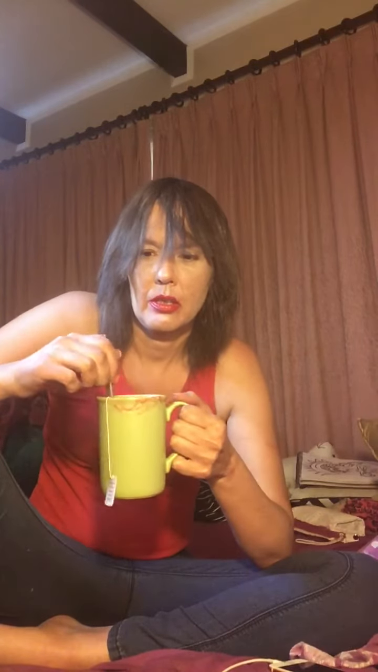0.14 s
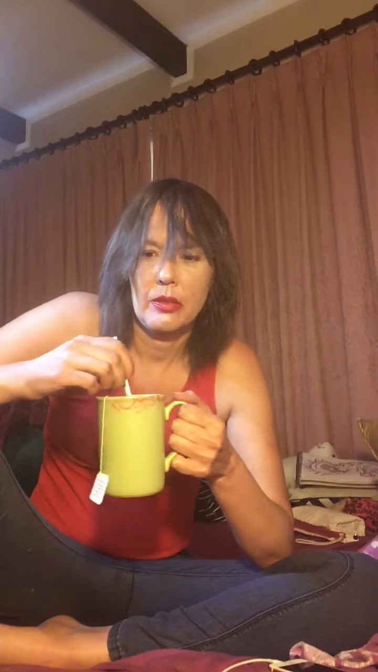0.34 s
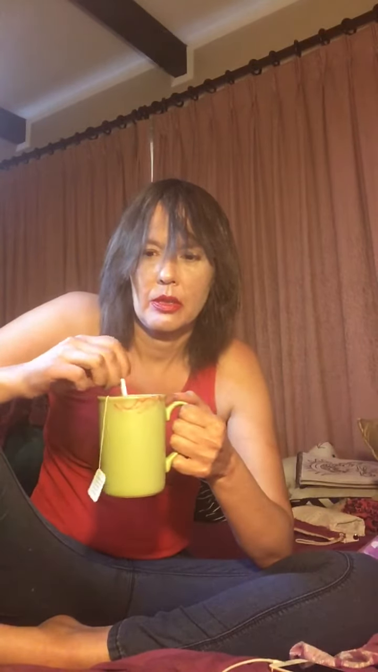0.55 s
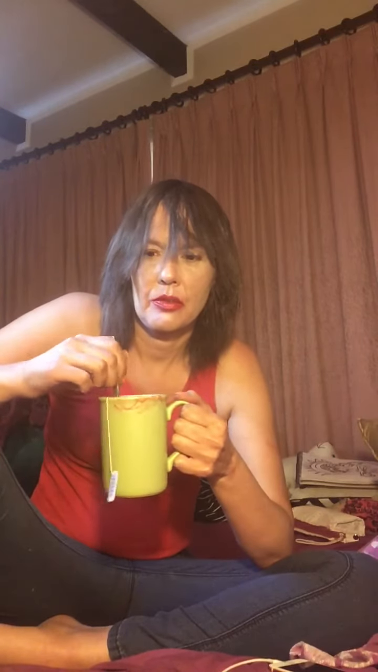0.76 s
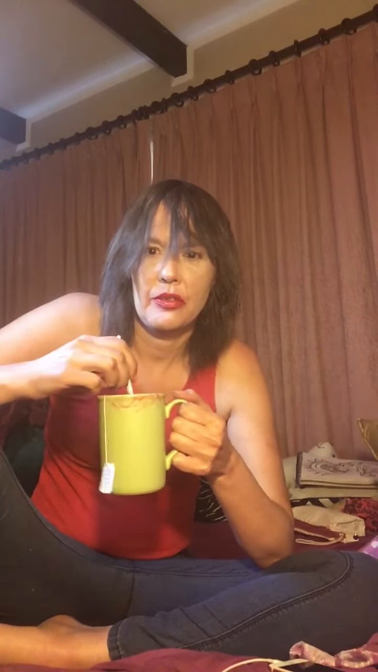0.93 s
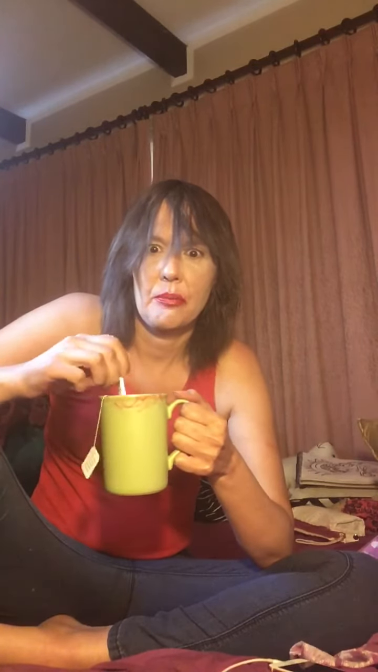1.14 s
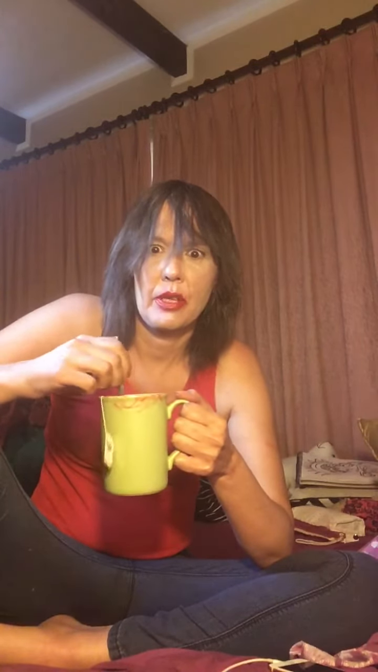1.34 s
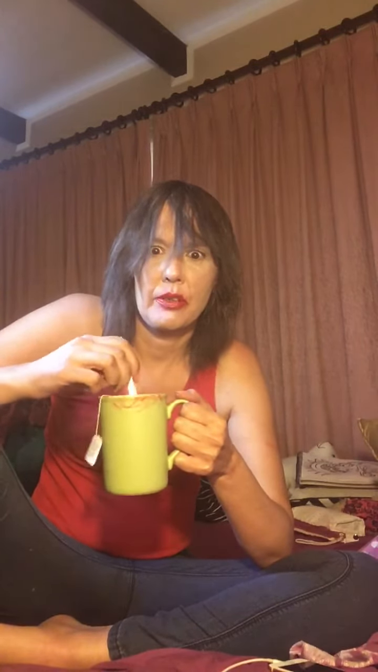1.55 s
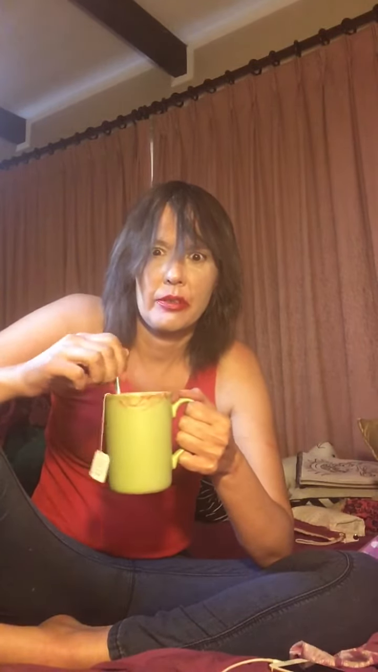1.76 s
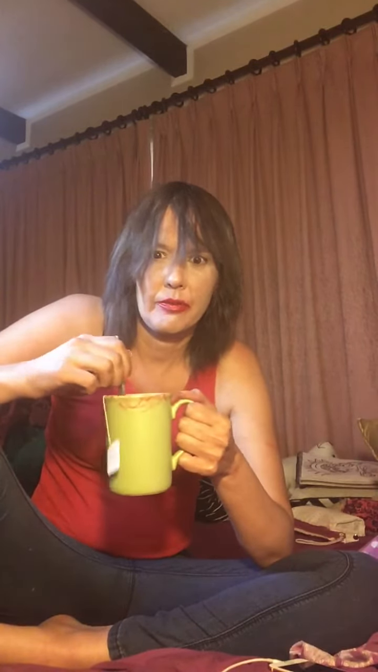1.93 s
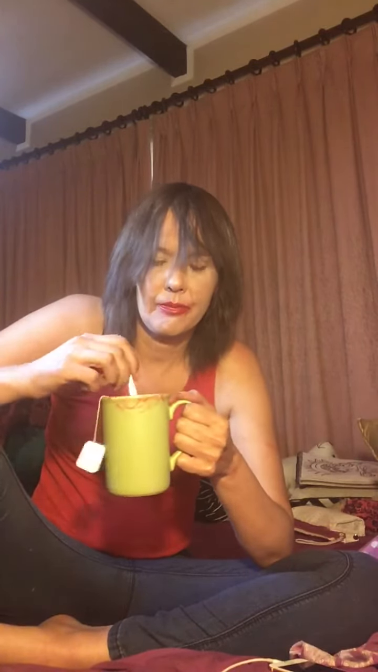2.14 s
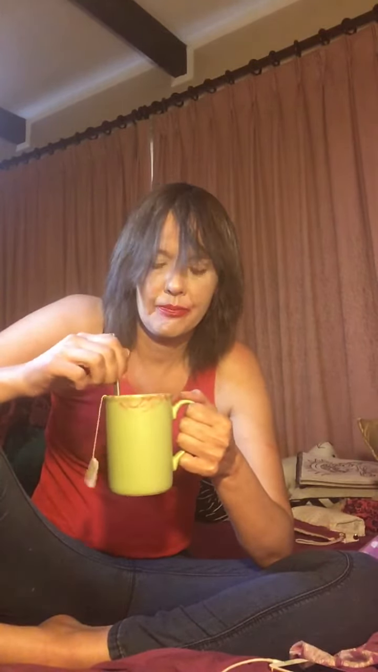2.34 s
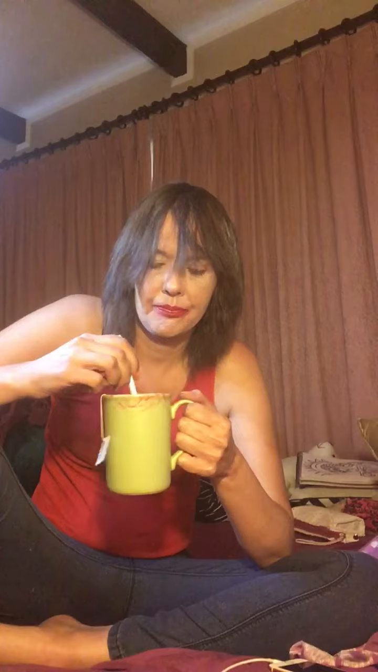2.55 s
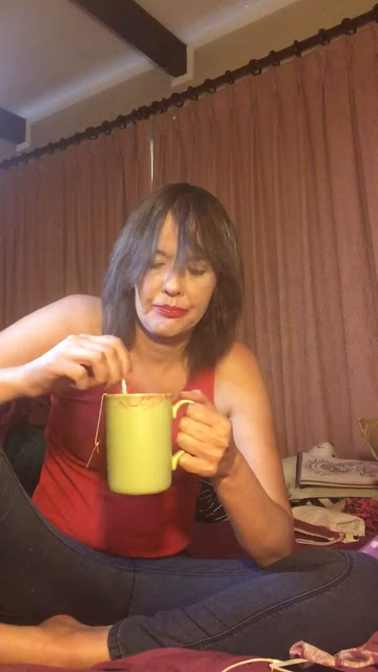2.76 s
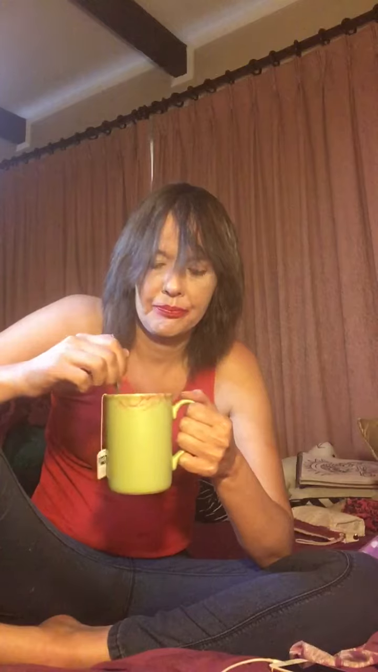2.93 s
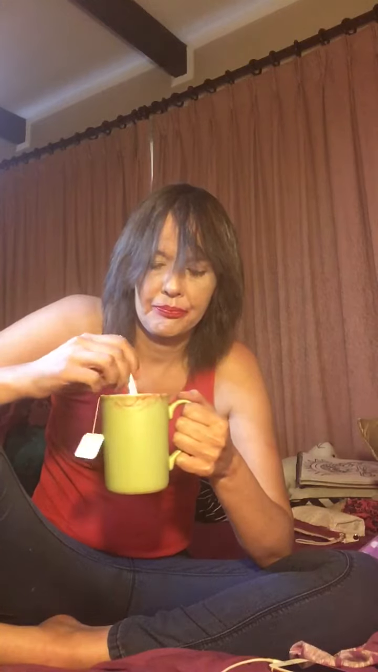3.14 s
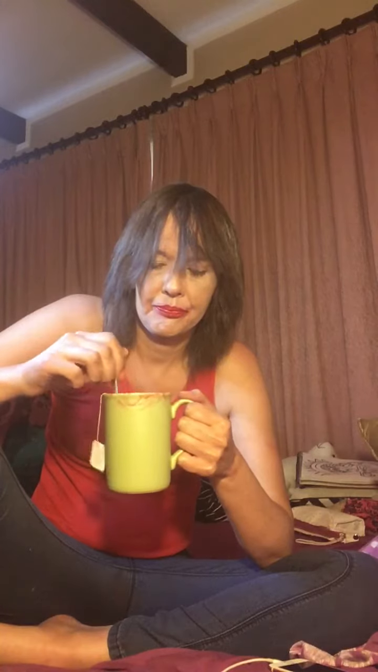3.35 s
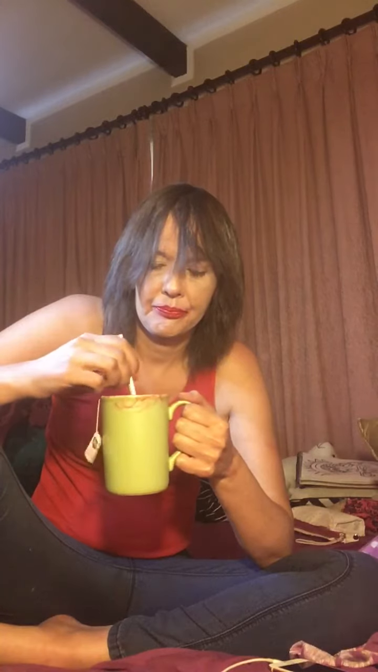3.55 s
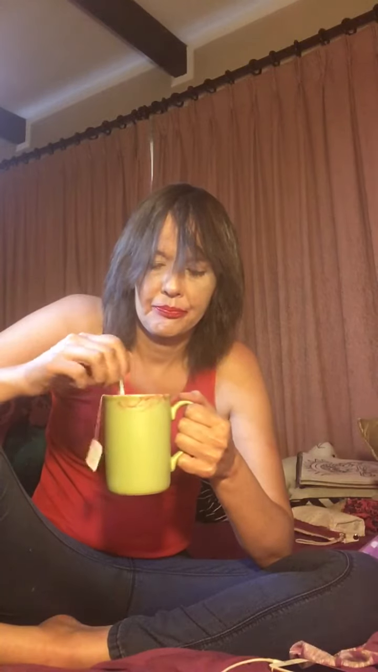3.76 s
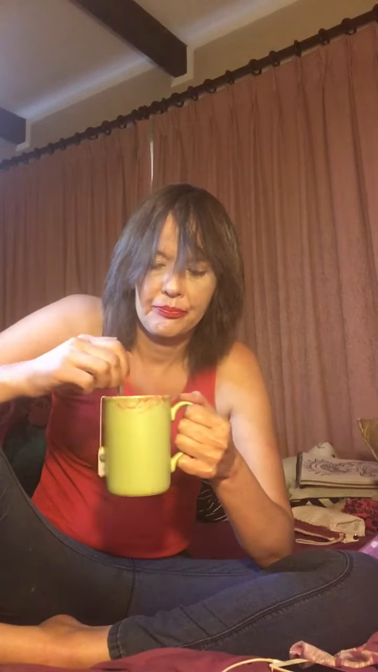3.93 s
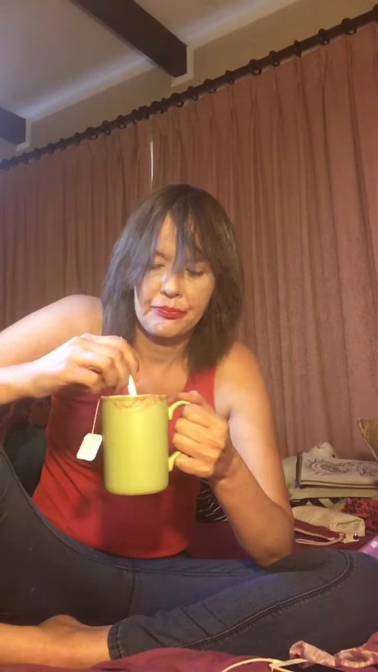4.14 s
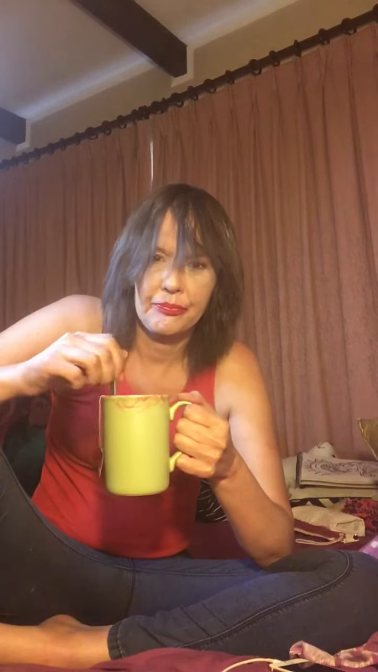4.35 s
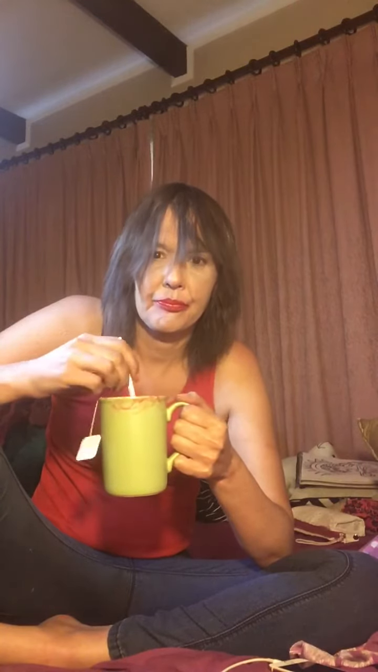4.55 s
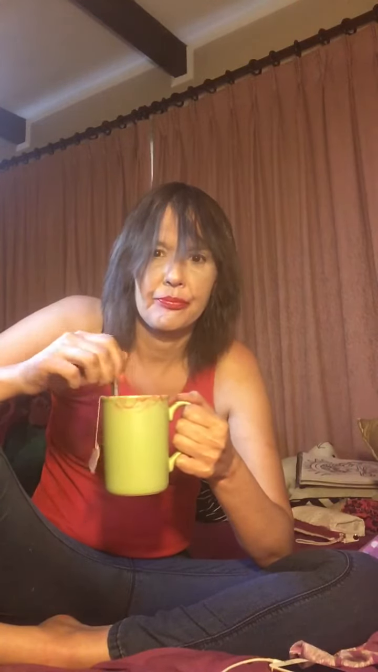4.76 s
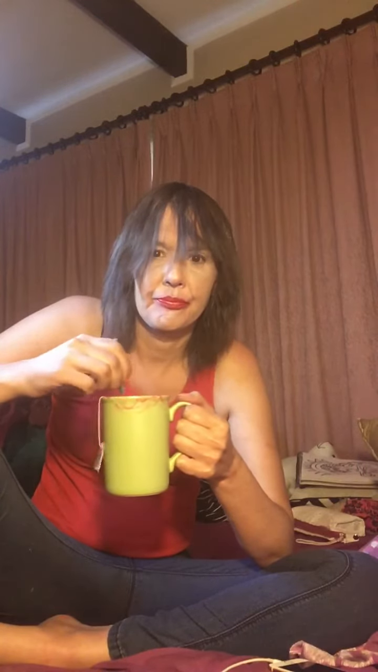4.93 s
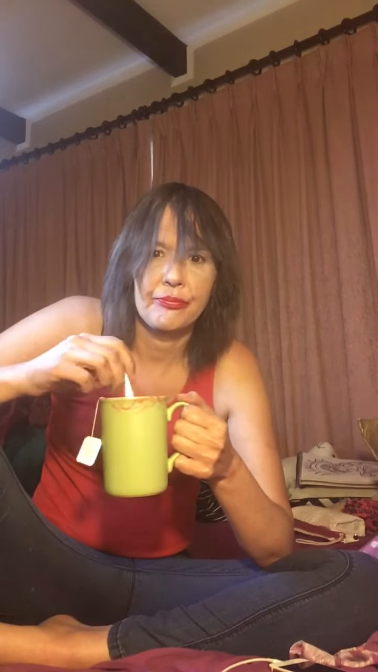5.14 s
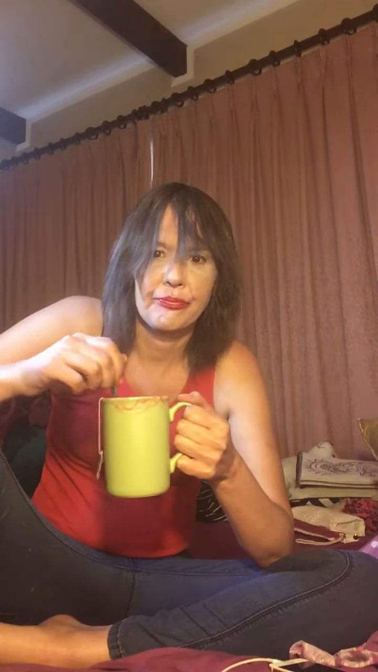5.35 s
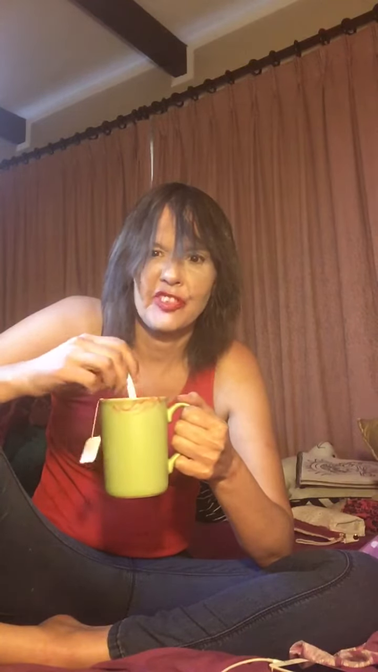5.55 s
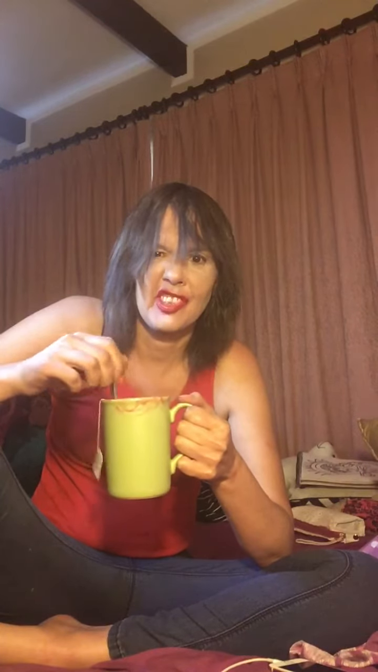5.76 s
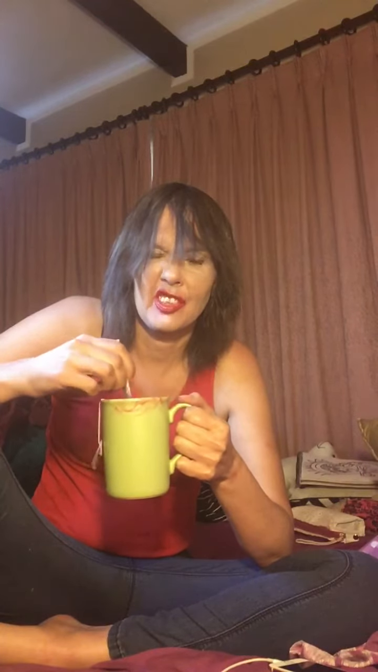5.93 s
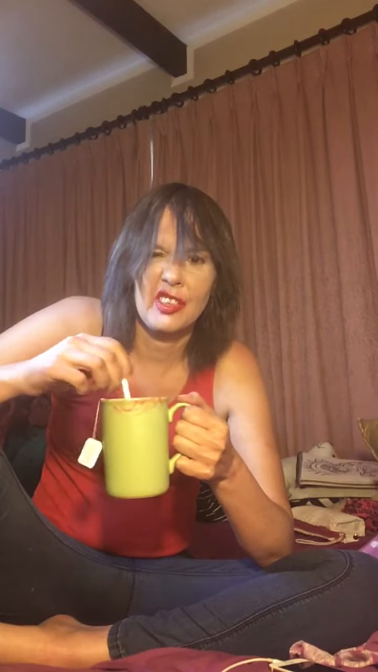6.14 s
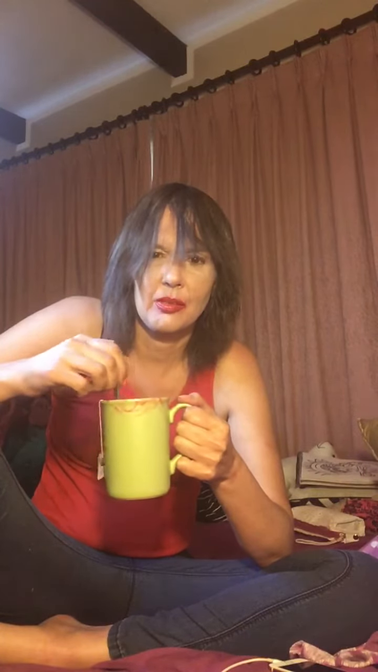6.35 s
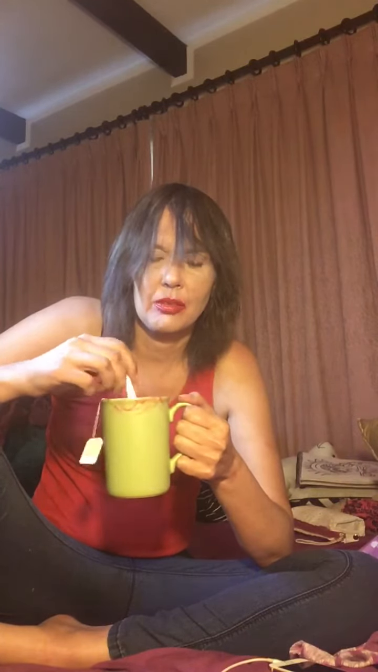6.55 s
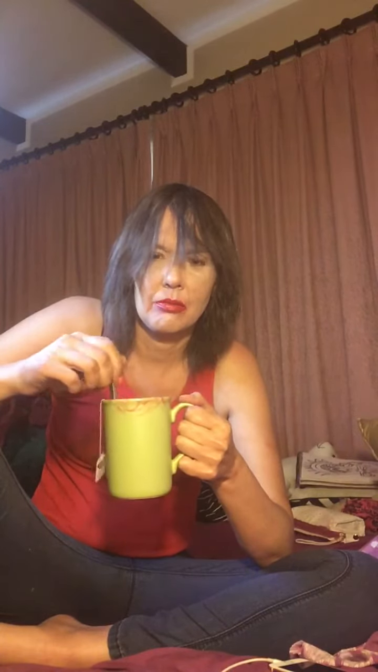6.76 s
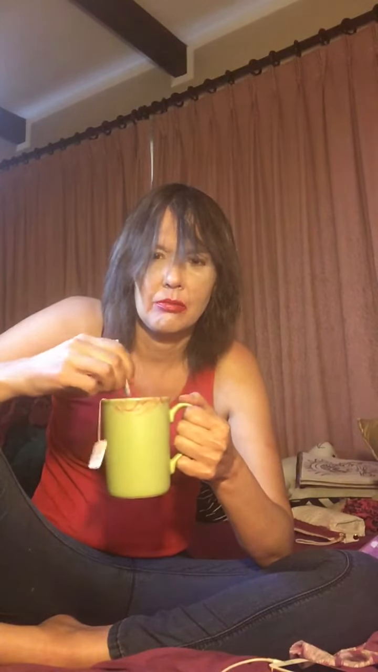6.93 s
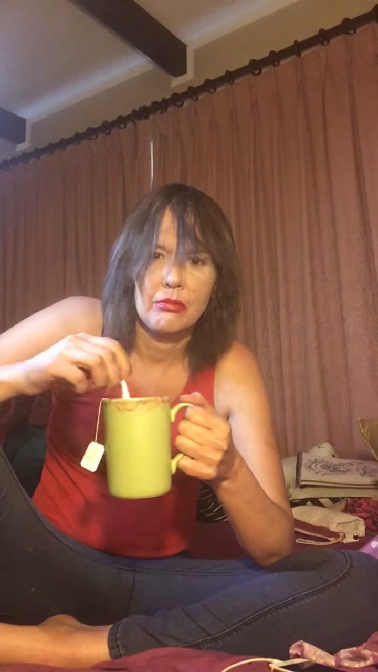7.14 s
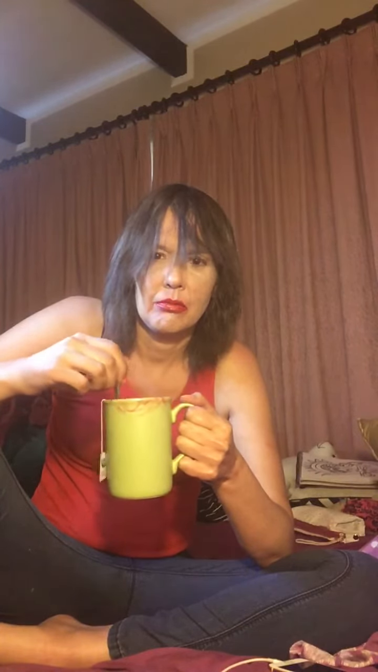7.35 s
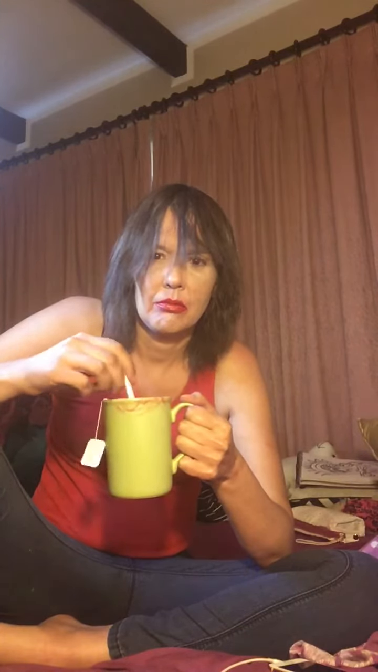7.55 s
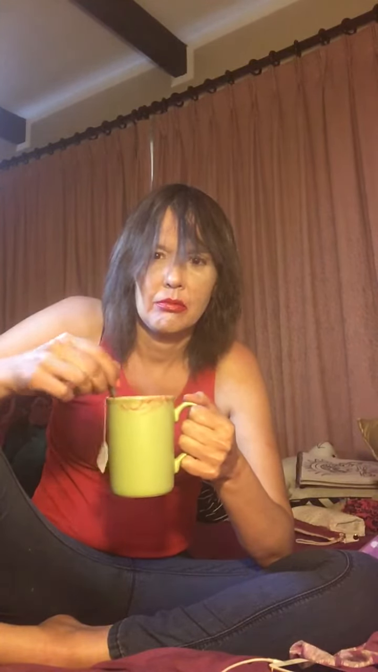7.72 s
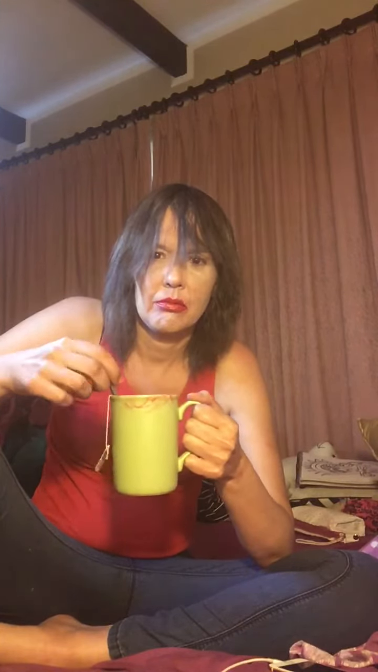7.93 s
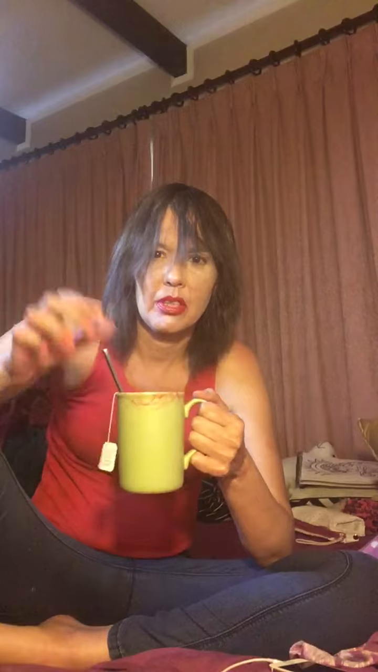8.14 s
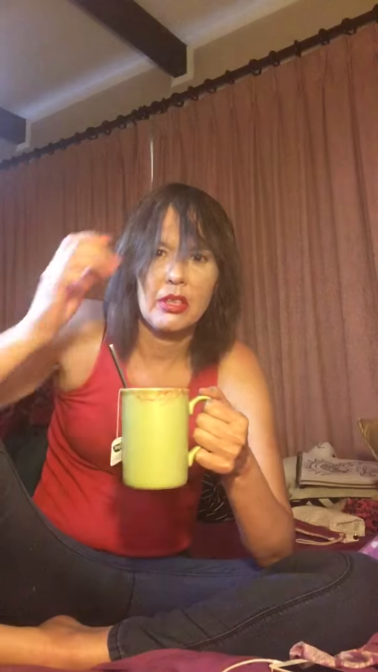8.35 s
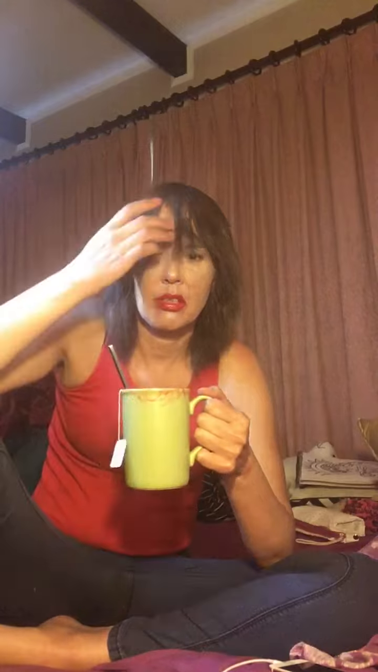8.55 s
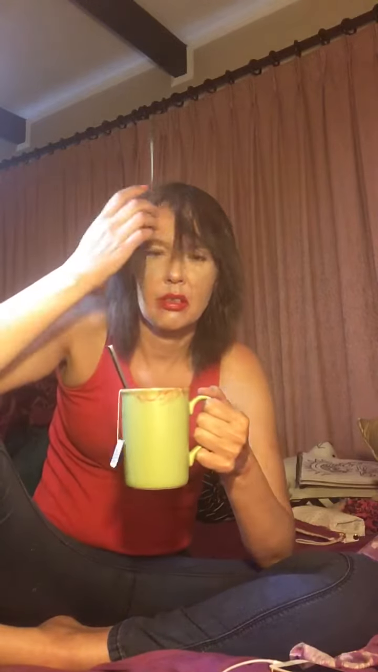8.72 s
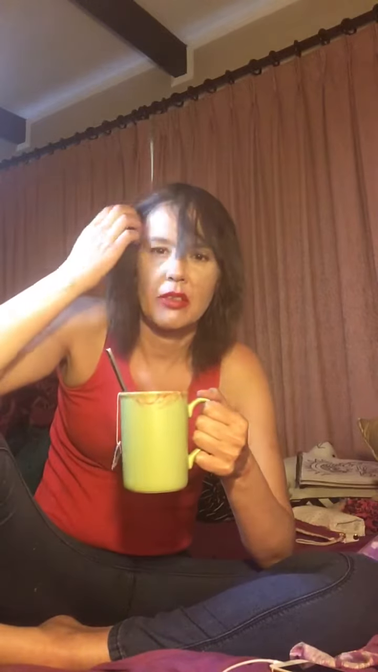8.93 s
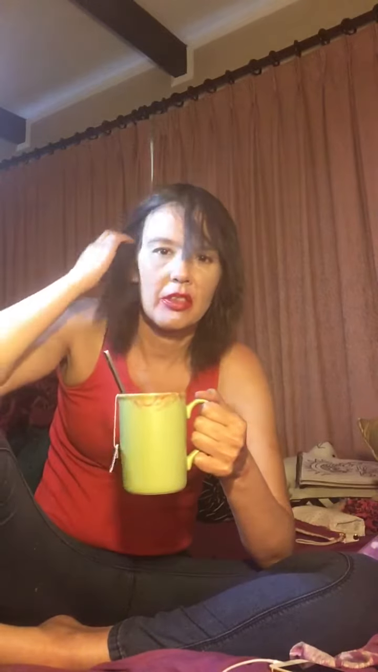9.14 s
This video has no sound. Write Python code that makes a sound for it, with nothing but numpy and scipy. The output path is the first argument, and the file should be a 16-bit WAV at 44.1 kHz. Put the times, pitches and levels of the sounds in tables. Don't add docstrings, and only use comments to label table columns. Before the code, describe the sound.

Bright spoon clinks and gritty scrapes circle inside a tea-filled ceramic mug for about eight seconds, ending abruptly in soft room hush.

```python
import sys
import numpy as np
from scipy import signal
from scipy.fft import rfft, irfft, next_fast_len
from scipy.io import wavfile
from scipy.ndimage import map_coordinates

SR = 44100
rng = np.random.default_rng(int(sys.argv[2]) if len(sys.argv) > 2 else 0)


def generate_wav(signal):
    frames = np.transpose(np.atleast_2d(signal))
    scaled = np.clip(frames, -1, 1) * 32767
    pcm = np.round(scaled).astype(np.int16)
    wavfile.write(sys.argv[1], SR, pcm)


def invert_db(x):
    u = np.asarray(x, float) / 20
    return 10 ** u


N = 409688

# frequency in Hz, density in dB per Hz.
RUMBLE = [(15, -39), (25, 7), (37, -10.5), (97, 1), (129, -7), (236, -9), (303, -16), (430, -20.5),
          (500, -28), (650, -38), (1100, -120)]
THUMP = [(40, -18), (70, 6), (110, 2), (160, -6), (230, 7.5), (300, -8), (500, -60.5)]
HISS = [(300, 3.5), (450, -6.5), (650, -3.5), (900, -5.5), (2600, -7), (6000, -12), (12000, -16),
        (14500, -18), (15900, -21)]
HOUSE_DB, HISS_DB = -66, -70
# centre in seconds, rise in dB, length in seconds.
SWELLS = [(0.47, 7, 0.12), (0.687, 13.5, 0.04), (1.3, 5, 0.11), (1.645, 4, .06), (2.063, 8.5, .13),
          (3.69, 6.5, 0.055), (4.5, 6, 0.029), (5.3, 2.5, 0.069), (6.24, 4.5, .12), (6.953, 11, 0.078),
          (7.957, 5, 0.12), (8.785, 4.5, 0.058), (9.106, -0.5, 0.053), (9.29, -0.5, 0.038)]
# centre in seconds, level in dB, centre in Hz, length in seconds.
RUSTLES = [
    (8.248, -66.5, 820, 0.02),
    (9.19, -74, 3800, 0.015),
    (9.235, -64, 820, 0.023),
    (9.23, -66.5, 2900, 0.012),
]
# frequency in Hz, T60 in seconds.
ROOM = [(500, 0.36), (2000, 0.21), (6000, 0.25), (14000, 0.21)]

# frequency in Hz, width in Hz, level in dB.
TEA = [(693, 116, -8), (1049, 35, -3.5), (1149, 20, -4.5), (1318, 91, 12.5), (1585, 86, -10)]
WALL = [(2040, 150, -43), (1949, 40, -2.5), (1987, 22, -7.5), (2022, 59, -0.5), (2044, 42, -9),
        (2055, 13, -4.5), (2164, 112, -5)]
RIM = [(2514, 30, -9.5), (2762, 155, 5.5), (2923, 88, 1), (3120, 270, -12), (3626, 34, -10),
       (4025, 86, -2.5), (4565, 90, 1.5)]
SPOON = [(5330, 185, 4), (5700, 56, -9), (5650, 10.7, -10.5), (5940, 86, 5.5), (5830, 133, 10),
         (6297, 77, 14), (6620, 9.4, -4), (6210, 36, -15)]
SHIMMER = [(7420, 160, -9), (7390, 62, -17.5), (9050, 1000, -5), (8164, 100, -2.5), (8990, 115, 0.5),
           (10520, 91, -3), (12400, 220, -43), (12900, 500, -22), (11700, 990, -16), (12250, 72, -3),
           (13840, 200, -12.5)]
FAMILIES = TEA, WALL, RIM, SPOON, SHIMMER

# top speed in seconds, mug in dB, spoon in dB, tea in dB, run-up in seconds.
NEAR = [(0.005, -50, -53.5, -86, 0.073), (0.09, -63.5, -65, -83, 0.058), (0.55, -57, -57, -92, .12),
        (0.91, -58.5, -63, -94, 0.069), (1.15, -54, -54.5, -78, 0.14), (1.68, -54, -57.5, -74, 0.12),
        (2.2, -55.5, -58, -67, 0.15), (2.46, -63, -68, -68, 0.081), (2.76, -53, -51.5, -75, 0.16),
        (3.28, -56, -53.5, -72, 0.16), (3.75, -53.5, -51.5, -94, 0.09), (4.27, -51.5, -52, -69, 0.12),
        (4.76, -52, -50.5, -94, 0.11), (5.24, -53.5, -52, -67, .15), (5.71, -53, -55.5, -80, 0.15),
        (6.2, -59, -59.5, -72, 0.23), (6.71, -54.5, -55.5, -83, 0.17), (7.18, -59, -56.5, -73, 0.12),
        (7.63, -59, -59.5, -67.5, 0.17), (0.35, -73, -79, -80, 0.09), (1.4, -67, -71.5, -68.5, 0.17),
        (0.2, -62, -71, -60, 0.029), (1.27, -88, -91, -71.5, 0.21)]
FAR = [(1.96, -53.5, -65.5, -79, 0.088), (3.03, -53, -62.5, -68, 0.2), (3.53, -47.5, -58, -66, 0.12),
       (4.02, -52, -62, -66.5, 0.17), (4.49, -51, -58.5, -69, 0.13), (4.99, -52.5, -63.5, -67, 0.13),
       (5.45, -51.5, -62.5, -66.5, 0.093), (5.92, -53.5, -65.5, -61, 0.11), (6.11, -71, -87, -75, .06),
       (6.5, -63, -81, -61.5, 0.068), (6.94, -58, -67, -67.5, 0.17), (7.42, -54, -66, -72, 0.15),
       (0.83, -71, -82, -63, 0.11), (6.33, -60, -67.5, -64.5, 0.02), (7.06, -61, -74, -66.5, 0.046),
       (4.62, -55, -73, -87, 0.08)]
RUN_UP_DB, RUN_OUT_S, RUN_OUT_DB, STOP_POWER = -14, 0.075, -11.5, 2.4
EDGE_DB, FAR_EDGE_DB = -6.5, -3.5
BRISK_DB, SHIMMER_GROWTH = -54, 0.6
# frequency in Hz, density in dB per Hz.
SCRAPE = [(300, -51), (700, -11.5), (2500, 6), (5000, -1), (8000, 0.5), (14000, -16.5), (16000, -33)]
SCRAPE_DB = -7.5

# start in seconds, mug in dB, spoon in dB, rim over wall in dB, shimmer over spoon in dB.
CLINKS = [(0.271, -29.5, -30, 1, 1.5), (0.4288, -44, -20, -3, -4.5), (0.8757, -27.5, -19, -9, -2.5),
          (1.8218, -43.5, -37, 5.5, -4), (2.4257, -33, -30, 0.3, 0.5), (2.8931, -48, -41.5, 10.5, -4),
          (3.3884, -37.5, -44, -1, 1), (4.3887, -36, -33.5, 1, 4.5), (6.3957, -33.5, -31, 0.5, -1.5),
          (7.8247, -35, -25, 5, 1), (7.9362, -35, -23, 4, -7.5)]
# first flight in seconds, loss per rebound in dB.
HOPS = [(.0243, 8.5), (0.026, 10), (.02, 29.5), (0.009, 5.5), (0.012, 14), (.0095, 5), (0.015, 18),
        (.02, 29), (0.03, 4), (0.0054, 21), (0.014, 1)]
FLIGHT_RATIO, REBOUNDS, CLINK_TEA_DB = 0.72, 4, -16.5
# start in seconds, mug in dB, spoon in dB, tea in dB.
KNOCKS = [(1.034, -51.5, -46, -71), (1.5391, -53, -50.5, -52), (1.6093, -42, -35, -62),
          (1.8088, -42.5, -41.5, -46), (2.0973, -45, -38, -52), (2.5943, -48, -42, -53),
          (3.204, -43.5, -39.5, -51.5), (3.5506, -43, -44.5, -59), (3.6298, -44, -43, -50.5),
          (3.8559, -38.5, -41.5, -44.5), (3.9034, -41.5, -39.5, -53), (4.1183, -42, -40, -40.5),
          (4.557, -38.5, -39.5, -40), (4.7918, -54, -40.5, -56), (4.931, -43, -44.5, -56.5),
          (5.0798, -43, -51, -44.5), (5.2969, -42.5, -41, -44), (5.5378, -42.5, -44, -45.5),
          (5.7181, -43, -35.5, -73), (5.89, -39, -32.5, -45), (6.0474, -44, -42, -48),
          (6.2601, -40.5, -38.5, -45.5), (6.7286, -42, -34.5, -55), (6.8781, -48, -50, -51),
          (7.2588, -38.5, -35.5, -47.5), (7.3495, -61, -64, -62), (7.5436, -47, -48, -57),
          (7.721, -46.5, -41, -45.5)]
# start in seconds, mug in dB, spoon in dB.
TAPS = [(0.9794, -67, -54), (1.6864, -59, -63), (1.72, -50, -38.5), (1.9414, -59, -57), (2.1849, -50, -59),
        (2.8094, -59, -58), (3.0274, -42.5, -48), (3.1252, -48, -46), (3.1736, -47.5, -43),
        (3.696, -40.5, -48), (4.1764, -45.5, -49), (4.5047, -47, -54), (4.5116, -44, -40),
        (5.0193, -62, -47), (5.3704, -49, -54), (5.779, -49, -61), (6.097, -52, -57), (6.9346, -44, -52),
        (7.0954, -46, -53), (7.6091, -56, -46)]
TAP_TEA_DB, RIM_DB, SHIMMER_DB, SPOT_DB = -16, 0.5, -1.5, 3.5
# start in seconds, level in dB.
TICKS = [
    (2.402, -56),
    (5.6321, -46.5),
    (7.374, -58),
    (8.1794, -59),
    (8.7154, -59),
]
SKID_S, SKID_DB, LEAD_S, LEAD_DB = 0.0026, -2.5, 0.0081, -24.5
SOFT_DB, SOFT_SKID = -37, 1.28
# frequency in Hz, density in dB per Hz.
CRACK = [(700, -39.5), (1300, -4), (3000, -1.5), (7500, 5), (10000, -14.5), (15000, -13)]
CRACK_DB, CRACK_S = -5, 0.0028
BELL_HZ, BELL_WIDTH_HZ, BELL_DB = 2078, 12, -7.5

LOW_HZ, TOP_HZ = 38, 15900


def unit(x):
    return x / np.sqrt(np.mean(x ** 2) + 1e-20)


def along(points, at_hz):
    hz, value = np.transpose(points)
    return np.interp(np.log(at_hz + 1), np.log(hz + 1), value)


def wobble(rate_hz):
    at = np.arange(0, N + 32, 32)
    knots = rng.standard_normal(int(N * rate_hz / SR) + 4)
    return np.interp(np.arange(N), at, map_coordinates(knots, [at * rate_hz / SR]))


def filtered(x, response):
    size = next_fast_len(len(x) + 8192)
    return irfft(rfft(x, size) * response(np.fft.rfftfreq(size, 1 / SR)), size)[:len(x)]


def coloured(spectrum):
    return unit(filtered(rng.standard_normal(N), lambda f: invert_db(along(spectrum, f))))


def background():
    t = np.arange(N) / SR
    house_db = HOUSE_DB + sum(db * np.exp(-0.5 * ((t - s) / length_s) ** 2) for s, db, length_s in SWELLS)
    rumble = invert_db(house_db + 1.9 * wobble(18)) * coloured(RUMBLE + [(20000, -120)])
    thump = invert_db(2 * house_db + 47) * coloured(THUMP + [(20000, -120)])
    hiss = invert_db(HISS_DB + 0.15 * wobble(1.1)) * coloured([(20, -120), (200, -48)] + HISS)
    return rumble + thump + hiss


def rustles():
    t, out = np.arange(N) / SR, 0
    for s, db, hz, length_s in RUSTLES:
        puff = coloured([(hz / 2, -25), (hz * 0.75, 0), (hz * 1.75, -4), (hz * 3, -25), (20000, -60)])
        out = out + invert_db(db) * np.exp(-0.5 * ((t - s) / length_s) ** 2) * puff
    return out


def room_tail():
    f, t, z = signal.stft(rng.standard_normal(SR // 3), SR, nperseg=128)
    h = signal.istft(z * invert_db(-60 * t / along(ROOM, f)[:, None]), SR, nperseg=128)[1]
    h = h * np.clip(np.arange(len(h)) / (0.006 * SR), 0, 1) ** 2
    return h / np.linalg.norm(h)


def strokes(rows):
    t, out = np.arange(N) / SR, np.zeros((3, N))
    for s, *levels_db, run_up_s in rows:
        span = slice(max(round((s - 0.5) * SR), 0), round((s + 0.5) * SR))
        late_s = t[span] - s
        rise_db = RUN_UP_DB * (late_s / run_up_s) ** 2
        fall_db = RUN_OUT_DB * np.abs(late_s / RUN_OUT_S) ** STOP_POWER
        out[:, span] += invert_db(levels_db)[:, None] * invert_db(np.where(late_s < 0, rise_db, fall_db))
    return out


def flight(lift_db, length_s):
    t, starts = np.arange(N) / SR, np.sort([row[0] for row in CLINKS + KNOCKS])
    ahead_s = np.append(starts, np.inf)[np.searchsorted(starts, t)] - t
    return lift_db * np.clip(1 - ahead_s / length_s, 0, 0.5) * 2


def resonate(force, modes, roam_db, swirl):
    out = 0
    for hz, width_hz, db in modes:
        if width_hz < 500:
            pole = np.exp(-np.pi * width_hz / SR)
            feedback = [1, -2 * pole * np.cos(2 * np.pi * hz / SR), pole ** 2]
            mode = signal.lfilter([1, 0, -1], feedback, force)
            out = out + invert_db(db + roam_db * wobble(9)) * np.sqrt(1 - pole) * mode
    return unit(map_coordinates(out, [np.arange(N) + swirl]))


def drag(grit_share, chatter_db, rim_db, wet_db):
    rub = rng.standard_normal(N) * (1 + grit_share * rng.exponential(1, N))
    rub = rub * invert_db(chatter_db * (wobble(40) + wobble(150)))
    swirl = 45 * wobble(4)
    lift = invert_db(flight(lift_db=-4.5, length_s=0.052))
    near, far = lift * strokes(NEAR), lift * strokes(FAR)
    wall, spoon, tea = near + far
    both = np.sqrt(wall * spoon)
    edge = near[1] * invert_db(EDGE_DB) + far[1] * invert_db(FAR_EDGE_DB)
    shimmer = edge * (spoon / invert_db(BRISK_DB)) ** SHIMMER_GROWTH
    gains = tea, wall, both * invert_db(rim_db), spoon, shimmer
    dry = sum(gain * resonate(rub, modes, 3.7, swirl) for modes, gain in zip(FAMILIES, gains))
    scrape = unit(filtered(rub, lambda f: invert_db(along(SCRAPE, f))))
    dry = dry + invert_db(SCRAPE_DB) * both * scrape
    return dry + invert_db(wet_db) * signal.fftconvolve(dry, room_tail())[:N]


def contacts():
    rows = []
    for (s, mug, spoon, rim, shimmer), (hop_s, loss_db) in zip(CLINKS, HOPS):
        levels_db = np.array([mug + CLINK_TEA_DB, mug, mug + rim, spoon, spoon + shimmer])
        for k in range(REBOUNDS + 1):
            flown_s = hop_s * (1 - FLIGHT_RATIO ** k) / (1 - FLIGHT_RATIO)
            rows.append((s + flown_s, *(levels_db - loss_db * k)))
    rows += [(s, -120, -120, -120, db - 6, db) for s, db in TICKS]
    soft = KNOCKS + [(s, mug, spoon, mug + TAP_TEA_DB) for s, mug, spoon in TAPS]
    spots = SPOT_DB * rng.standard_normal((len(soft), 2))
    for (s, mug, spoon, tea), (a, b) in zip(soft, spots):
        rows.append((s, tea, mug + a, mug + RIM_DB - a, spoon, spoon + SHIMMER_DB + b))
    return rows


def skid(level_db):
    t = np.arange(-882, 882) / SR
    stretch = SOFT_SKID if level_db < SOFT_DB else 1
    spread = np.where(t < 0, invert_db(LEAD_DB) * np.exp(t / LEAD_S), np.exp(-t / (SKID_S * stretch)))
    grains = spread * rng.standard_normal(len(t)) * rng.exponential(1, len(t)) ** 2
    force = (t == 0) / stretch + invert_db(SKID_DB) * grains / np.linalg.norm(grains)
    return force / np.linalg.norm(force)


def ring(modes, t, scatter_db, tilt_db, grip):
    hz, width_hz, db = np.transpose(modes)[..., None]
    luck = rng.standard_normal((4, *hz.shape))
    hz = hz * (1 + 0.005 * luck[0])
    width_hz = width_hz * np.exp(grip * luck[1]) * np.maximum(hz / 5000, 1) ** 1.3
    size = invert_db(db + scatter_db * luck[2] + tilt_db * np.log2(hz / hz[0]))
    tones = size * np.exp(-np.pi * width_hz * t) * np.sin(2 * np.pi * (hz * t + luck[3]))
    return np.sum(tones, axis=0) / np.linalg.norm(size) * (1 - np.exp(-t / 0.0002))


def knocks(wet_db, scatter_db, tilt_db, grip):
    out, t = np.zeros(N + SR), np.arange(SR // 4) / SR
    snap = coloured([(15, -120)] + CRACK)
    for s, *levels_db in contacts():
        blow = 0
        for modes, level_db in zip(FAMILIES, levels_db):
            blow = blow + invert_db(level_db + 2) * ring(modes, t, scatter_db, tilt_db, grip)
        crack = np.exp(-t / CRACK_S) * np.roll(snap, -round(s * SR))[:len(t)]
        blow = blow + invert_db(levels_db[3] + CRACK_DB) * crack
        if levels_db[1] > SOFT_DB:
            bell_hz = BELL_HZ * (1 + 0.0065 * rng.standard_normal())
            bell = np.exp(-np.pi * BELL_WIDTH_HZ * t) * np.sin(2 * np.pi * bell_hz * t)
            blow = blow + invert_db(levels_db[1] + BELL_DB) * bell
        blow = signal.fftconvolve(blow, skid(max(levels_db)))[:len(t)]
        echo = signal.fftconvolve(blow, room_tail())
        start = round((s - 0.0196) * SR)
        out[start:start + len(t)] += blow
        out[start:start + len(echo)] += invert_db(wet_db) * echo
    return out[:N]


def scene():
    stirring = drag(grit_share=0.36, chatter_db=2.0, rim_db=-4.5, wet_db=-6.5)
    striking = knocks(wet_db=-4.5, scatter_db=5.0, tilt_db=-4, grip=0.13)
    return (background() + rustles() + stirring + striking)[None]


def low_pass(x):
    return signal.sosfilt(signal.butter(12, 16480, fs=SR, output="sos"), x)


def record(dry):
    heard = filtered(dry[0], lambda f: (f < TOP_HZ) * f ** 8 / (f ** 8 + LOW_HZ ** 8))
    return low_pass(heard)


dry = scene()
out = record(dry)
generate_wav(out)
```